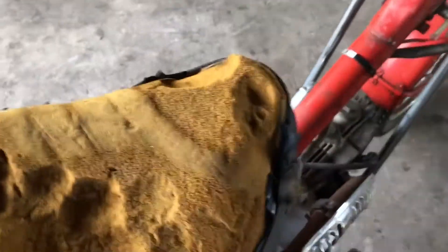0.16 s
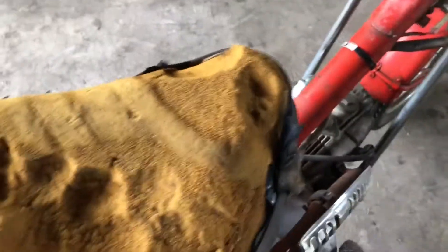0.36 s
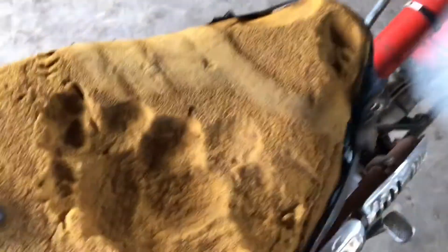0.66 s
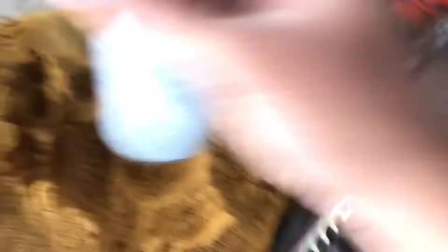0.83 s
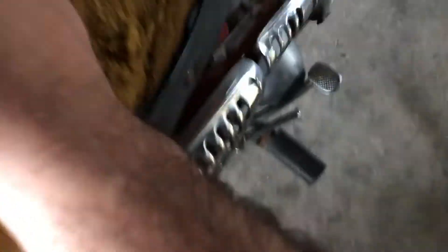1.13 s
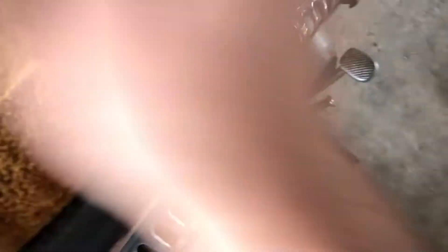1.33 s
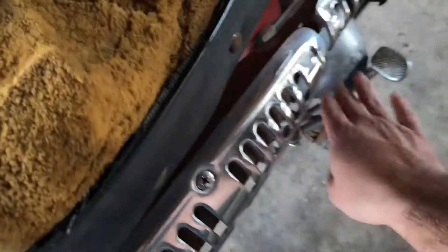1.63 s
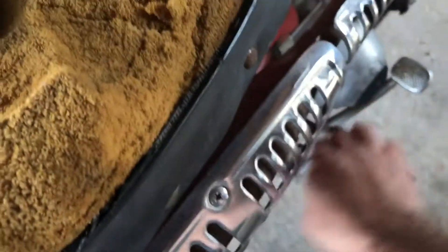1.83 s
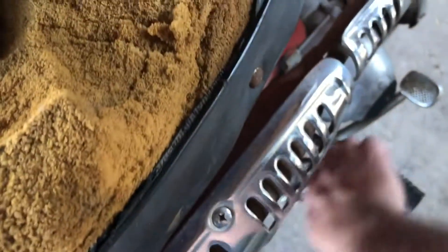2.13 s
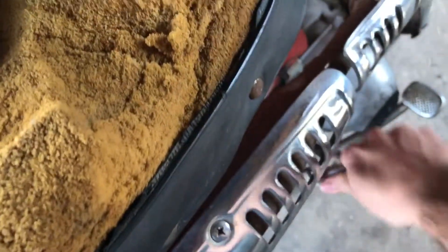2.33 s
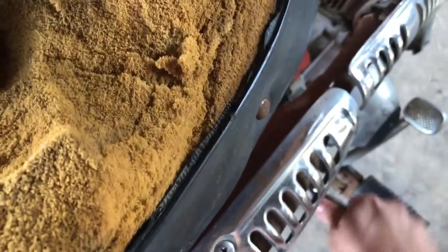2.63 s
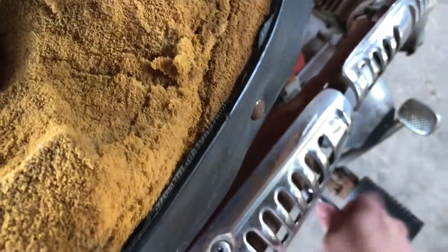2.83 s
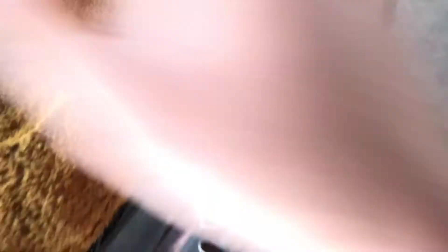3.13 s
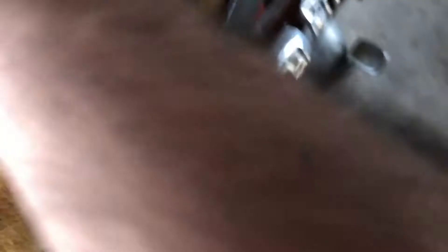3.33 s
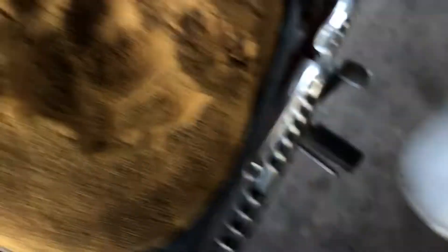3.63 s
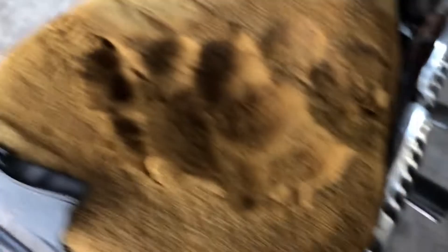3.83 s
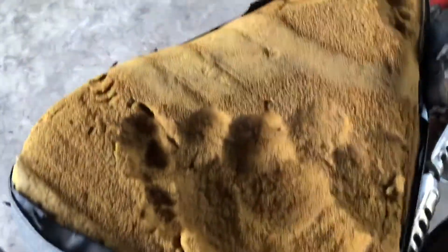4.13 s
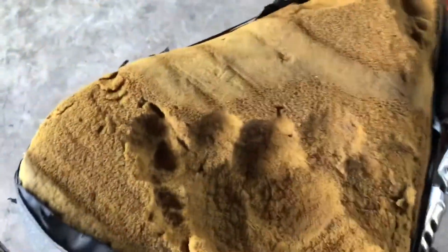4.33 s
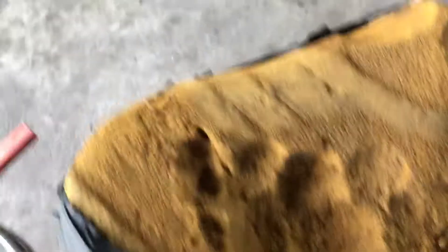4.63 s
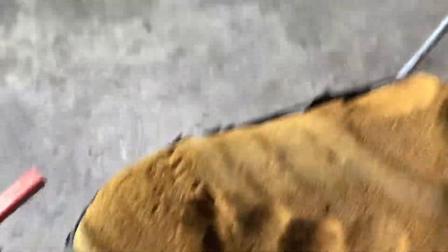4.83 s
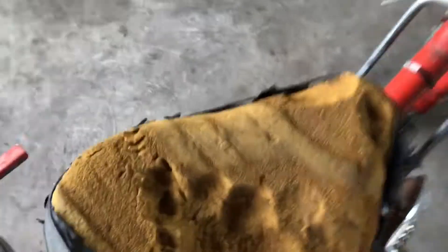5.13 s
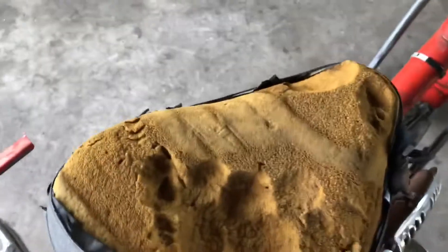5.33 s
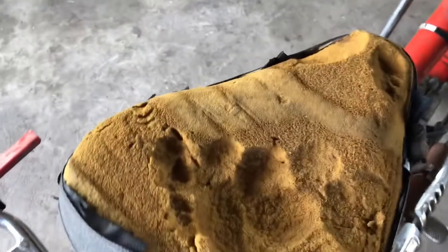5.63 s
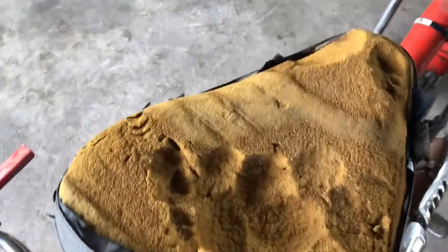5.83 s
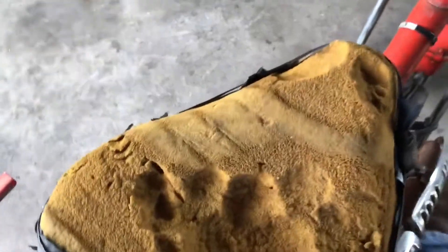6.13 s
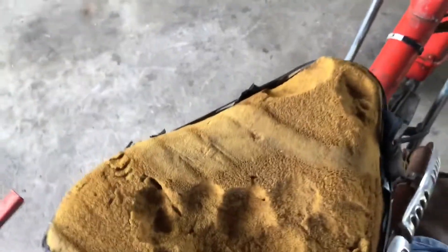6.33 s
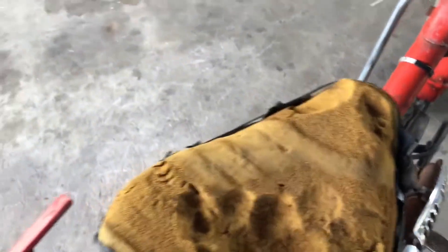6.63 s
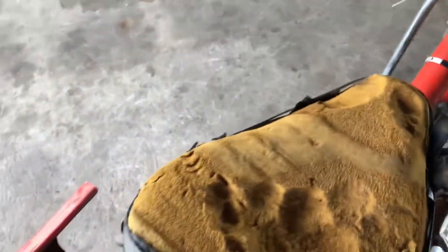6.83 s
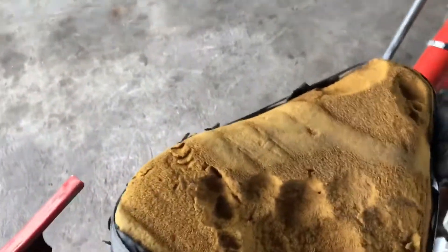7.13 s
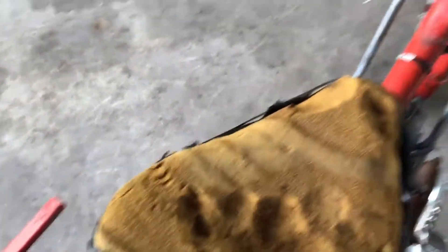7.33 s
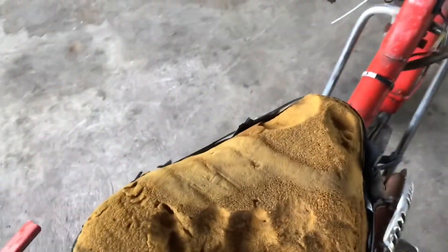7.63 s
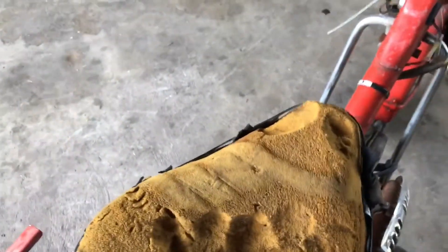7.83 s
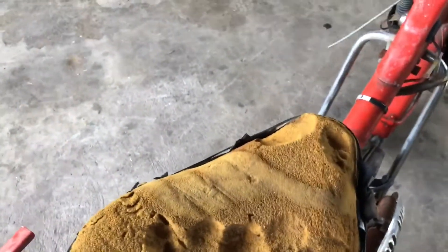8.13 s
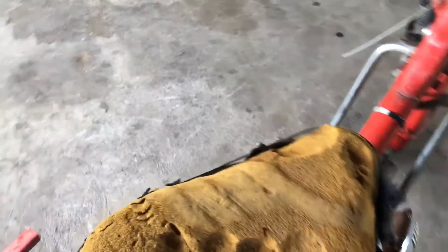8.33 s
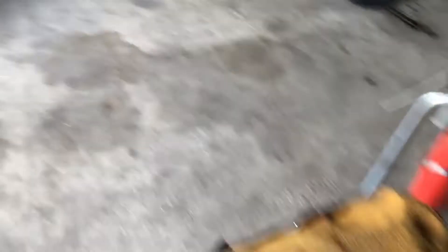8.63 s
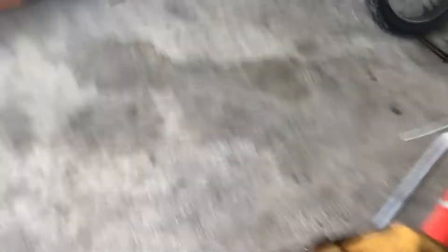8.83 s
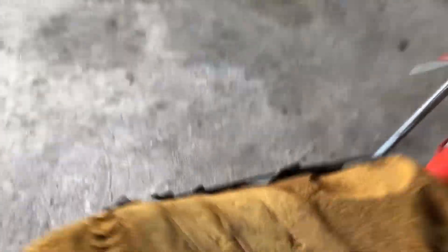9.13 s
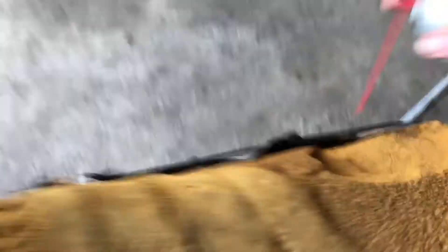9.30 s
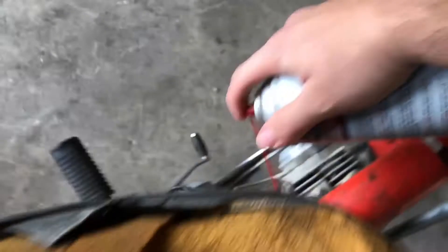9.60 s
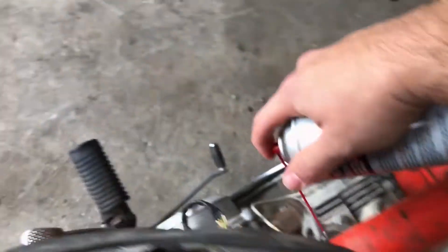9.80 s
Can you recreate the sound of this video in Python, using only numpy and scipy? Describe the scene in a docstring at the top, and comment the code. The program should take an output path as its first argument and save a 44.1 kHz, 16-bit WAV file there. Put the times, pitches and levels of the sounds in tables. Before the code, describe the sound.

Quiet garage air, with small metal knocks close to the microphone and a short hard-walled echo. A dry pivot squeaks as the lever swings out. The first kick thumps, hisses and gulps without catching; the lever bounces on its stop. After scattered clunks and scraping, a harder kick clatters and the single cylinder fires for an instant, barking, then booms hollowly as its pulses slow.

```python
"""A garage with a concrete floor and bare walls: a small old single-cylinder motorcycle is kick-started, heard
from the seat. Still air and clothes are shaped noise; knocks, clinks and bumps are short forces ringing modes.
The lever is swung out with a squeak; a first kick only gulps air, a gliding tone under hiss and two thin high
whistles, and the lever slams back. After more clunks a second kick spins the engine up: pulses timed by the crank
ring exhaust, air box and valve gear. It fires for a moment, then coasts down with its air box booming."""
import sys
import numpy as np
from scipy import signal
from scipy.fft import rfft, irfft, next_fast_len
from scipy.io import wavfile

SR = 44100
rng = np.random.default_rng(int(sys.argv[2]) if len(sys.argv) > 2 else 0)


def transcribe(signal):
    """Save signal, clipped to [-1, 1], as a 16-bit WAV file at the path in sys.argv[1]."""
    frames = np.atleast_2d(signal).T
    limited = np.clip(frames, -1, 1)
    pcm = np.round(limited * 32767).astype(np.int16)
    wavfile.write(sys.argv[1], SR, pcm)


N = 439236
T = np.arange(N) / SR  # s

# Layer levels in the tables and settings stand ahead of the trims in the functions.
# still air of the garage, its spectrum: f/Hz, relative level/dB
AIR_SPECTRUM = [(18, -38), (30, -2.5), (126, -0.5), (359, -3.5), (399, -7), (479, -6.5), (673, -11),
                (747, -12.5), (1110, -11.5), (1400, -12), (1680, -15), (15500, -28)]
AIR_DB = -57.5
# rubbing cloth, its spectrum: f/Hz, relative level/dB
CLOTH_SPECTRUM = [(200, 4.5), (700, -11), (2000, -5), (4000, 0.5), (8000, -3.5), (15000, -5)]
# movements of the rider's clothes: start t/s, length t/s, level/dB
RUSTLES = [(.88, 0.24, -44), (1.2, 3.2, -58), (3.85, 0.15, -52.5), (5.82, 0.17, -48.5)]
RUSTLE_ATTACK_S, RUSTLE_FADE_DB_PER_S, RUSTLE_REST_DB = 0.072, 98.5, -58
# reverberation of the garage: f/Hz, time to fall by 60 dB t/s
GARAGE_DECAY = [(100, 0.61), (350, 0.63), (1000, 0.41), (3000, 0.41), (7000, 0.35), (15000, 0.083)]

# soft bumps against the seat: t/s, level/dB
BUMPS = [(3.109, -38), (3.17, -41), (3.354, -42), (3.425, -45), (4.813, -16), (6.49, -51), (8.619, -22),
         (8.711, -19)]
# modes of the seat: f/Hz, width f/Hz, relative level/dB
SEAT_MODES = [(72, 30, -2), (128, 35, -7)]
BUMP_LENGTH_S = .003  # sets the strength of the push

# sole and gears scrape while the lever is pushed: start t/s, length t/s, level/dB
SCRAPES = [(0, 0.07, -40.5), (1.82, 0.14, -48.5), (4.18, .11, -43.5), (4.46, 0.75, -43),
           (6.55, 0.34, -43.5), (6.95, 0.21, -60.5), (7.51, 0.042, -53), (8.07, 0.075, -48.5),
           (8.51, .09, -52), (8.6, 0.11, -31.5)]
# scraping, its spectrum: f/Hz, relative level/dB
SCRAPE_SPECTRUM = [(200, -11.5), (300, 5), (500, -3.5), (900, -3), (1500, -2.5), (2200, -9.5), (3500, -13),
                   (7000, -23), (15000, -44.5)]
SCRAPE_ATTACK_S, SCRAPE_FADE_DB_PER_S = 0.0083, 94

# small parts that ring on after a knock, and two thin high whistles in the gulp's hiss at 4.82 s:
# t/s, f/Hz, width f/Hz, starting level at 25 Hz width/dB
PINGS_AND_WHISTLES = [(.334, 1050, 15, -37), (.334, 1430, 220, -38), (.334, 2200, 300, -25),
                      (.334, 5400, 280, -24.5), (.334, 7520, 24, -41), (1.295, 2720, 25, -49),
                      (3.412, 4650, 38, -49), (2.66, 3200, 16, -31), (2.695, 9300, 54, -30.5),
                      (4.30, 3750, 75, -42.5), (4.655, 805, 160, -29.5), (4.82, 11300, 69, -14),
                      (4.82, 15480, 100, -9), (4.961, 1020, 64, -17), (5.264, 3470, 70, -33),
                      (6.076, 295, 44, -44), (6.648, 665, 57, -23), (6.66, 3500, 16, -42),
                      (6.66, 322, 16, -32), (7.815, 887, 160, -22.5), (7.815, 3420, 20, -40),
                      (7.815, 5350, 39, -39), (7.815, 5590, 140, -32), (8.212, 4150, 30, -39)]
# knocks of lever, gears and frame: t/s, level/dB, hardness/dB, chatter time t/s
KNOCKS = [(.001, -41.5, -12, 0.01), (.313, -43.5, 4.5, 0.0072), (.334, -23, 6.5, 0.0015),
          (.644, -53, -7, 0.026), (1.826, -54, 1, 0.008), (1.88, -48.5, 1, 0.0092), (1.921, -42, -1, .006),
          (2.378, -44, 1.5, 0.012), (2.876, -45.5, -4.5, 0.0032), (3.41, -53, 9, .0063),
          (4.125, -50.5, -15.5, 0.002), (4.219, -45, -7, 0.0057), (4.252, -44.5, -4, 0.014),
          (4.285, -45, 0, .005), (4.306, -38.5, -11, 0.0029), (4.505, -37.5, -5, 0.015),
          (4.577, -48.5, 6.5, 0.007), (4.641, -36.5, -3.5, 0.0082), (4.699, -44.5, -19.5, 0.0044),
          (4.802, -16, 3, 0.0032), (4.961, -18.5, 3.5, 0.015), (5.264, -35.5, 2, 0.0041),
          (5.392, -36, -5.5, 0.0024), (5.631, -37, 0.5, 0.0039), (5.732, -43.5, -6, 0.0059),
          (6.075, -52, -16, 0.0093), (6.114, -47.5, -4, 0.0051), (6.632, -32, -2, 0.015),
          (6.65, -40, 7, 0.045), (6.78, -40.5, -5.5, 0.018), (7.812, -33, 2.5, 0.018),
          (8.193, -38.5, -1, 0.015), (8.21, -33.5, -3, 0.004), (8.3, -43, 1.5, 0.0056),
          (8.617, -37, -13, .005), (8.683, -22, -3.5, 0.019), (8.768, -20.5, -6.5, 0.0077),
          (8.838, -14.5, 4, 0.019), (8.846, -11.5, -0.5, 0.011)]
# split of a knock over frame, crankcase, steel, tick: share at no hardness/dB, gain per dB of hardness/dB
KNOCK_SHARES = [(-1, -1), (-3.5, 0), (-7, 1.34), (-15.5, 2.55)]
# modes of frame, crankcase, small steel parts and tick: f/Hz, width f/Hz, relative level/dB
FRAME_MODES = [(114, 41, -13), (225.4, 33, -4), (271, 66, -1), (362, 158, -3.5), (437, 34, -5),
               (574, 430, -5)]
CASE_MODES = [(680, 120, -7), (850, 100, -7), (980, 90, -4), (1100, 110, -5), (1300, 130, -3),
              (1450, 120, -5), (1680, 160, -3), (2150, 350, -2)]
STEEL_MODES = [(2690, 830, -0.5), (3770, 580, -2), (4170, 340, -5.5), (5070, 830, -1.5), (5810, 250, -5.5),
               (6620, 460, -7)]
TICK_MODES = [(7650, 330, -2), (8300, 6400, 3.5), (12200, 4000, 0.5), (15200, 1100, -4.5)]
# the lever slams against its stop and rebounds, each flight shorter by the same factor
SLAM_S, FIRST_FLIGHT_S, RESTITUTION = 4.961, .092, .83
REBOUND_DB, REBOUND_LOSS_DB, REBOUND_HARDNESS_DB, REBOUND_CHATTER_S = -34.5, 1.5, -5, 0.01
STOP_HZ, STOP_WIDTH_HZ, STOP_DB, STOP_LOSS_DB = 940, 180, -18.5, 5.5

# blows on the free kick lever: t/s, level/dB
LEVER_TAPS = [(.866, -44.5), (2.377, -28.5), (2.39, -36), (2.604, -32.5), (2.652, -33.5), (2.671, -36),
              (3.412, -56), (4.30, -53), (5.264, -38), (5.633, -41)]
# zings of the return spring: t/s, level/dB
SPRING_TAPS = [(6.657, -24.5), (6.669, -20), (6.685, -21), (6.708, -30)]
# modes of lever, return spring and squeaking pivot: f/Hz, width f/Hz, relative level/dB
LEVER_MODES = [(2910, 130, 0.5), (3163, 100, 4), (3190, 51, -10), (3350, 92, 4.5), (4960, 120, -20),
               (6100, 350, -6.5)]
SPRING_MODES = [(7990, 47, 5), (8260, 24, -1), (8366, 18, -2), (8700, 34, -2)]
SQUEAK_MODES = [(3180, 140, 0)]
# the hand swings the lever out on its dry pivot: start t/s, length t/s, level/dB
PIVOT = [(2.513, 0.19, -34.5)]
# grinding pivot, its spectrum: f/Hz, relative level/dB
PIVOT_SPECTRUM = [(400, -49), (900, -6), (1400, 1), (2000, 4), (2600, -6), (4000, -2), (6000, -15),
                  (9500, -9), (12000, -10.5), (15000, -16)]
PIVOT_ATTACK_S, PIVOT_FADE_DB_PER_S = .012, 900
SQUEAK_HZ, SQUEAK_SAG_HZ_PER_S, SQUEAK_SWAY_HZ = 3320, 1100, 32  # the sway is rms

# one gulp of air through the carburettor: t/s, pitch f/Hz, tone level/dB, hiss level/dB
GULP = [(4.802, 277.3, -41.5, -10.5), (4.813, 246, -15.5, -32), (4.831, 235, -18, -18),
        (4.846, 268, -14, -23.5), (4.868, 325, -14, -26), (4.89, 405, -17, -30.5),
        (4.91, 477, -29.5, -35.5), (4.935, 570, -38, -41), (4.958, 590, -37, -40.5)]
# hiss of the gulp, its spectrum: f/Hz, relative level/dB
GULP_SPECTRUM = [(300, 0), (1000, -11.5), (1800, -2), (3300, -3), (6500, -2), (9000, -8.5), (11300, -6),
                 (13500, -1.5), (15500, -15.5)]
# the engine starts to turn over and draws air: t/s, level/dB
DRAW = [(8.49, -58.5), (8.6, -28), (8.75, -34), (8.82, -19.5)]
# modes of the intake tract: f/Hz, width f/Hz, relative level/dB
INTAKE_MODES = [(81, 16, -8), (258, 32, 4.5), (510, 87, 3), (640, 82, 2), (1030, 360, 2.5),
                (1400, 200, -27)]

# crank speed: t/s, turns per second f/Hz
CRANK = [(8.5, 8.18), (8.62, 8.73), (8.71, 13.54), (8.83, 22.17), (8.95, 33.14), (9.08, 42.35),
         (9.2, 40.47), (9.4, 34.87), (9.6, 29.39), (9.8, 24.47), (9.96, 21.06)]
# modes of exhaust, its bark, air box and valve gear: f/Hz, width f/Hz, relative level/dB
EXHAUST_MODES = [(72, 9.6, -6.5), (112, 110, -13), (247, 70, -2), (315, 63, 7.5), (395, 320, -2),
                 (530, 39, -16), (660, 36, -13.5), (794, 94, -32), (953, 150, -9)]
BARK_MODES = [(693, 210, 0), (950, 250, -2), (1450, 140, -20)]
AIR_BOX_MODES = [(76, 22, -12), (120, 24, -11), (515, 17, 0), (640, 90, -20)]
VALVE_GEAR_MODES = [(1030, 230, 3.5), (1326, 85, -2), (1487, 55, -4.5), (1720, 75, -3.5), (2680, 640, -8),
                    (3720, 220, -10.5), (8700, 2000, -11.5)]
# rough metal clatter and gas hiss, their spectra: f/Hz, relative level/dB
CLATTER_SPECTRUM = [(500, 1.5), (850, -20), (1050, -11), (1450, -5.5), (2000, -6.5), (3000, -12),
                    (4200, -16), (6000, -38), (12000, -38)]
GAS_SPECTRUM = [(1500, -4), (4000, 2), (6500, -2), (9000, -1), (10500, -6), (13500, -5.5), (16000, -6)]
# each engine voice: its level at top speed, and what it loses when the speed halves (dB)
EXHAUST_DB, EXHAUST_DROP_DB = -16.5, 9.5
CLATTER_DB, CLATTER_DROP_DB = -19.5, 14
HISS_DB, HISS_DROP_DB = -27.5, 6.5
# the air box booms best at one crank speed and loses the last figure one octave away
BOOM_DB, BOOM_BEST_TURNS_PER_S, BOOM_DETUNE_DB = -11, 36.1, 23.5
GAS_ROUGHNESS, BARK_DB = .33, -2.5
# the kick takes hold of the crank
ENGAGE_S, ENGAGE_RISE_S = 8.58, 0.059
# the kick loads the gears: start t/s, length t/s, extra clatter level/dB
KICK = [(8.67, .22, 12)]
# the engine fires for a moment: start t/s, length t/s, extra exhaust level/dB
FIRING = [(8.662, .36, 8.5)]
LOAD_ATTACK_S, LOAD_FADE_DB_PER_S = 0.061, 135
KICK_HISS_SHARE, FIRING_BOOM_SHARE = 0.31, 0.23  # the load also lifts the hiss; firing weakens the boom

PIPES_ECHO_DB = -13
TOP_HZ = 15900


def amp(db):
    """Decibels to gain."""
    return 10 ** (np.asarray(db) / 20)


def unit(x):
    """Scale to rms 1."""
    return x / np.sqrt(np.mean(x ** 2))


def noise():
    """White noise as long as the scene."""
    return rng.standard_normal(N)


def fader(rows, axis=1):
    """Gain drawn through the dB column of a curve, silent outside it."""
    rows = np.array(rows)
    return amp(np.interp(T, rows[:, 0], rows[:, axis], left=-200, right=-200))


def swell(start, length, attack, fade_db_per_s):
    """Envelope 0-1: rise, hold until the length is over, die away."""
    rise = np.clip((T - start) / attack, 0, 1)
    return rise * amp(-fade_db_per_s * np.maximum(T - start - length, 0))


def swells(rows, attack, fade_db_per_s):
    """Summed gain of a table of movements (start, length, dB)."""
    return sum(amp(db) * swell(start, length, attack, fade_db_per_s) for start, length, db in rows)


def colour(x, points):
    """Shape x with a spectrum drawn over log frequency; rms 1."""
    hz, db = np.transpose(points)
    size = next_fast_len(len(x))
    f = np.maximum(np.fft.rfftfreq(size, 1 / SR), 1)
    gain = amp(np.interp(np.log(f), np.log(hz), db))
    return unit(irfft(rfft(x, size) * gain, size)[:len(x)])


def grit(spread_db):
    """Noise made of tiny slips of uneven size."""
    size = 24  # samples in a slip
    slip_gains = amp(spread_db * rng.standard_normal(N // size + 1))
    return noise() * np.repeat(slip_gains, size)[:N]


def decaying_sine(hz, width):
    """One damped mode, a third of a second long: the wider its resonance, the sooner it dies."""
    t = T[:SR // 3]
    return np.exp(-np.pi * width * t) * np.sin(2 * np.pi * hz * t)


def ring(x, modes):
    """Pass x through damped modes; each dB is that mode's share of the energy."""
    body = sum((-1) ** k * amp(db) * np.sqrt(width) * decaying_sine(hz, width)
               for k, (hz, width, db) in enumerate(modes))
    return signal.oaconvolve(x, body / np.linalg.norm(body))[:N]


def add(track, s, sound):
    """Mix a sound into a track at time s."""
    i = max(int(s * SR), 0)
    track[i:i + len(sound)] += sound[:max(N - i, 0)]


def blows(times, levels_db, chatters, spread_db=3.0):
    """Contact force: noise that rises fast as the parts meet, then chatters and settles."""
    force, t = np.zeros(N), T[:SR // 5]
    for s, db, chatter in zip(times, levels_db, chatters):
        unevenness = np.repeat(rng.standard_normal(len(t) // 30), 30)
        burst = rng.standard_normal(len(t)) * amp(spread_db * unevenness)
        burst *= np.exp(-t / chatter) * (1 - np.exp(-t / (0.082 * chatter)))
        strength = amp(db) * np.sqrt(SR * (chatter + 0.0014))  # longer chatter carries more energy
        add(force, s, burst / np.linalg.norm(burst) * strength)
    return force


def strike(taps, modes, chatter):
    """Ring one part with a table of taps."""
    times, levels = np.transpose(taps)
    return ring(blows(times, levels, np.full(len(times), chatter)), modes)


def background():
    """Still air in the garage and the rider's clothes, rubbing harder as they move."""
    air = colour(noise(), AIR_SPECTRUM) * amp(AIR_DB)
    moving = amp(RUSTLE_REST_DB) + swells(RUSTLES, RUSTLE_ATTACK_S, RUSTLE_FADE_DB_PER_S)
    return air + amp(-10.0) * colour(grit(spread_db=2.5), CLOTH_SPECTRUM) * moving


def garage(x):
    """Diffuse echo of bare walls: bands of decaying noise, of which the treble dies first."""
    t, tail = T[:SR], 0
    hz, t60 = np.transpose(GARAGE_DECAY)
    edges = np.geomspace(40, 18000, 10)
    for lo, hi in zip(edges, edges[1:]):
        band_filter = signal.butter(2, [lo, hi], "band", fs=SR, output="sos")
        band = signal.sosfilt(band_filter, rng.standard_normal(SR))
        band_t60 = np.interp(np.log(lo * hi) / 2, np.log(hz), t60)
        tail = tail + band * np.exp(-np.log(1000) * t / band_t60)
    tail = tail * np.clip((t - .003) / 0.0034, 0, 1)  # a short gap before the first echoes
    return signal.oaconvolve(x, tail / np.linalg.norm(tail))[:N]


def bumps():
    """Each bump is a single soft push that rocks the seat."""
    pushes = np.zeros(N)
    for s, db in BUMPS:
        add(pushes, s, np.array([amp(db) * np.sqrt(SR * BUMP_LENGTH_S)]))
    return ring(pushes, SEAT_MODES)


def scrapes():
    """Sole and gears rub and catch; random slips also ring the crankcase."""
    slips = (rng.random(N) < 90 / SR) * amp(2.3 * noise())  # about 90 a second
    rub = colour(grit(spread_db=4.5), SCRAPE_SPECTRUM) + amp(-14.0) * unit(ring(slips, CASE_MODES))
    return amp(-5.0) * rub * swells(SCRAPES, SCRAPE_ATTACK_S, SCRAPE_FADE_DB_PER_S)


def pings_and_whistles(rows):
    """Ringing parts and thin whistles: each row is one decaying sine at a pitch of its own."""
    track = np.zeros(N)
    for s, hz, width, db in rows:
        add(track, s, amp(db) * np.sqrt(width / 25) * decaying_sine(hz, width))
    return track


def rebounds(count=4):
    """The lever bounces on its stop, ever sooner and weaker; returns its knocks and its pings."""
    n = np.arange(count)
    times = SLAM_S + np.cumsum(FIRST_FLIGHT_S * RESTITUTION ** n)
    hits = [(s, REBOUND_DB - k * REBOUND_LOSS_DB, REBOUND_HARDNESS_DB, REBOUND_CHATTER_S)
            for k, s in zip(n, times)]
    rings = [(s, STOP_HZ, STOP_WIDTH_HZ, STOP_DB - k * STOP_LOSS_DB) for k, s in zip(n, times)]
    return hits, rings


def knocks(rows):
    """Soft knocks shake the frame and crankcase; harder ones reach the small steel parts."""
    s, db, hardness, chatter = np.transpose(rows)
    bodies = (FRAME_MODES, CASE_MODES, STEEL_MODES, TICK_MODES)
    return sum(ring(blows(s, db + share + gain * hardness, chatter), modes)
               for (share, gain), modes in zip(KNOCK_SHARES, bodies))


def lever():
    """The lever clinks, grinds and squeaks on its dry pivot, and its return spring zings."""
    press = swells(PIVOT, PIVOT_ATTACK_S, PIVOT_FADE_DB_PER_S)
    start, length = PIVOT[0][:2]
    # the squeak gathers and sags as the lever swings out
    sway = colour(noise(), [(10, -2.5), (80, -4), (300, -37.5)])
    hz = SQUEAK_HZ - SQUEAK_SAG_HZ_PER_S * np.clip(T - start, 0, 1) + SQUEAK_SWAY_HZ * sway
    whine = np.sin(2 * np.pi * np.cumsum(hz) / SR)
    travel = np.clip((T - start) / length, 0, 1)
    squeak = (whine + 0.37 * unit(ring(noise(), SQUEAK_MODES))) * press * travel
    grind = colour(grit(spread_db=4), PIVOT_SPECTRUM) * press
    clinks = strike(LEVER_TAPS, LEVER_MODES, chatter=0.005)
    zings = strike(SPRING_TAPS, SPRING_MODES, chatter=0.0018)
    return amp(-7.5) * grind + amp(0.5) * squeak + clinks + zings


def gulp():
    """The piston draws once: the air resonance dips, then glides upward, under a sharp hiss."""
    s, hz = np.transpose(GULP)[:2]
    phase = 2 * np.pi * np.cumsum(np.interp(T, s, hz)) / SR
    flutter = colour(noise(), [(20, 1), (120, -1.5), (400, -53.5)])
    tone = np.sqrt(2) * np.sin(phase) * (1 + 0.41 * flutter)
    hiss = colour(noise(), GULP_SPECTRUM)
    return tone * fader(GULP, axis=2) + hiss * fader(GULP, axis=3)


def draw():
    """Air rushing into the turning engine: noise rings the intake tract."""
    return unit(ring(noise(), INTAKE_MODES)) * fader(DRAW)


def strokes(turns, speed, lag, scatter_db, uneven_db):
    """One pulse a turn at a crank angle (lag, in turns), alternately strong and weak; mean power near 1."""
    at = np.flatnonzero(np.diff(np.floor(turns - lag)) > 0)
    pulses = np.zeros(N)
    db = scatter_db * rng.standard_normal(len(at)) + uneven_db * (-1) ** np.arange(len(at))
    pulses[at] = amp(db) * np.sqrt(SR / speed[at])
    return pulses


def air_box(turns, speed):
    """A third of a turn after the exhaust opens, one push and pull of air sets the box ringing."""
    slaps = strokes(turns, speed, lag=.34, scatter_db=.5, uneven_db=.5)
    u = (T[:SR // 200] - .0012) / .00047
    push_pull = -u * np.exp(-u ** 2 / 2)
    slap = signal.oaconvolve(slaps, push_pull / np.linalg.norm(push_pull))[:N]
    return .55 * slap + .9 * ring(slaps, AIR_BOX_MODES)


def engine_gains(speed):
    """Gains of exhaust, air box, clatter and hiss follow the speed; firing and the kick's load shift them."""
    halvings = np.log2(speed.max() / speed)
    detune = np.log2(speed / BOOM_BEST_TURNS_PER_S)  # octaves
    engaged = np.clip((T - ENGAGE_S) / ENGAGE_RISE_S, 0, 1)
    kick_db, firing_db = (sum(db * swell(s, length, LOAD_ATTACK_S, LOAD_FADE_DB_PER_S)
                              for s, length, db in rows) for rows in (KICK, FIRING))
    exhaust_db = EXHAUST_DB - EXHAUST_DROP_DB * halvings + firing_db
    boom_db = BOOM_DB - BOOM_DETUNE_DB * detune ** 2 - FIRING_BOOM_SHARE * firing_db
    clatter_db = CLATTER_DB - CLATTER_DROP_DB * halvings + kick_db
    hiss_db = HISS_DB - HISS_DROP_DB * halvings + KICK_HISS_SHARE * kick_db
    return engaged * amp([exhaust_db, boom_db, clatter_db, hiss_db])


def engine():
    """Every turn gives an exhaust puff, a slap in the air box and a clatter of metal."""
    speed = np.interp(T, *np.transpose(CRANK))
    turns = np.cumsum(speed * (T > CRANK[0][0])) / SR
    exhaust_gain, boom_gain, clatter_gain, hiss_gain = engine_gains(speed)

    since = (turns % 1) / speed  # seconds since the exhaust opened
    puff = np.exp(-since / .008) * np.sqrt(2 / (.008 * np.maximum(speed, 20)))
    pulses = strokes(turns, speed, lag=0, scatter_db=1.4, uneven_db=0)
    gas_flow = pulses + GAS_ROUGHNESS * puff * noise()
    # a strong firing steepens the pressure front, so the pipe barks
    bark_gain = exhaust_gain ** 2 / exhaust_gain.max()
    bark = amp(BARK_DB) * ring(gas_flow, BARK_MODES) * bark_gain
    exhaust = amp(-2.5) * ring(gas_flow, EXHAUST_MODES) * exhaust_gain + bark
    boom = amp(-3) * air_box(turns, speed) * boom_gain

    taps = sum(strokes(turns, speed, lag=angle, scatter_db=3, uneven_db=1) for angle in (.03, .2, .8))
    rough = colour(grit(spread_db=4), CLATTER_SPECTRUM) * (.45 + .6 * puff)
    clatter = amp(-2.0) * (rough + .4 * ring(taps, VALVE_GEAR_MODES)) * clatter_gain
    hiss = colour(grit(spread_db=0.5), GAS_SPECTRUM) * (0.59 + 0.48 * puff) * hiss_gain
    return exhaust + boom, clatter + hiss


def scene():
    """All parts of the motorcycle sound into the same room."""
    hits, rings = rebounds()
    metal = knocks(KNOCKS + hits) + lever() + scrapes()
    metal_and_whistles = metal + pings_and_whistles(PINGS_AND_WHISTLES + rings)
    air = gulp() + draw()
    pipes, rattle = engine()
    sent = amp(-7.0) * metal_and_whistles + amp(-15.5) * air + amp(PIPES_ECHO_DB) * pipes + amp(-8) * rattle
    return (metal_and_whistles + air + pipes + rattle + bumps() + garage(sent) + background())[None]


def record(dry):
    """Drop the deepest bass, round off the loudest peaks and cut the top."""
    order = 6  # the higher, the harder the knee
    dry = signal.sosfilt(signal.butter(4, 42, "high", fs=SR, output="sos"), dry)
    rounded = dry / (1 + dry ** order) ** (1 / order)
    return signal.sosfilt(signal.ellip(10, .2, 80, TOP_HZ, fs=SR, output="sos"), rounded)


dry = scene()
out = record(dry)
transcribe(out)
```